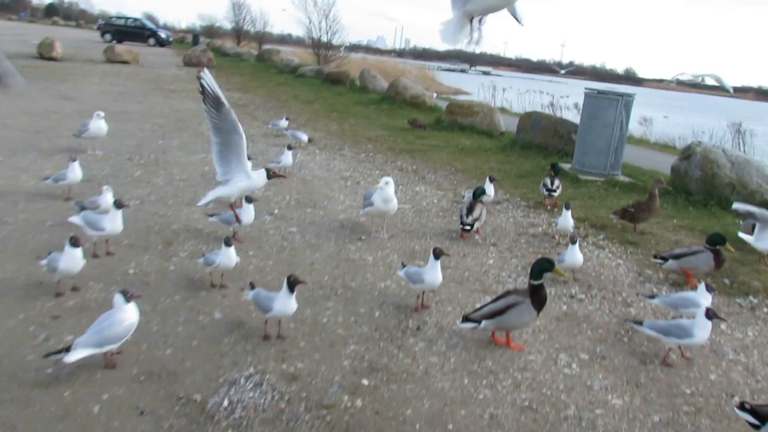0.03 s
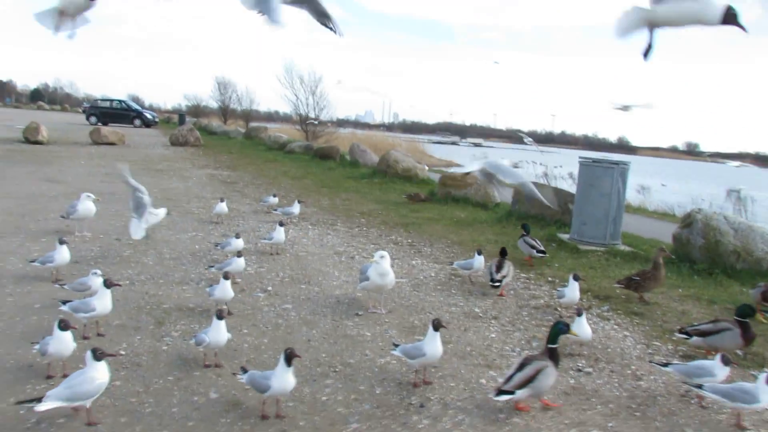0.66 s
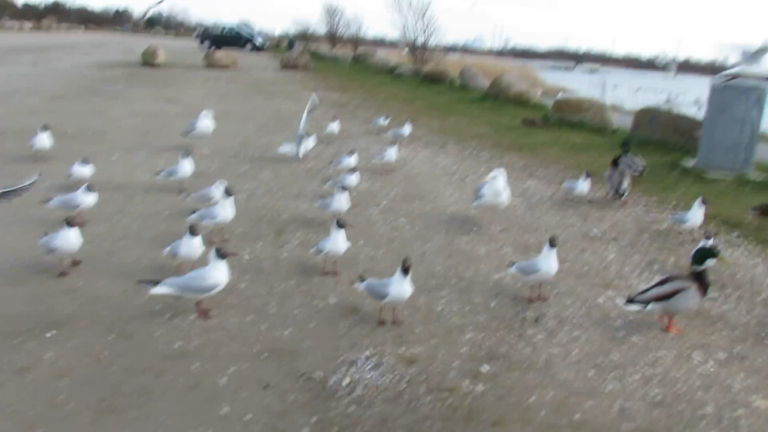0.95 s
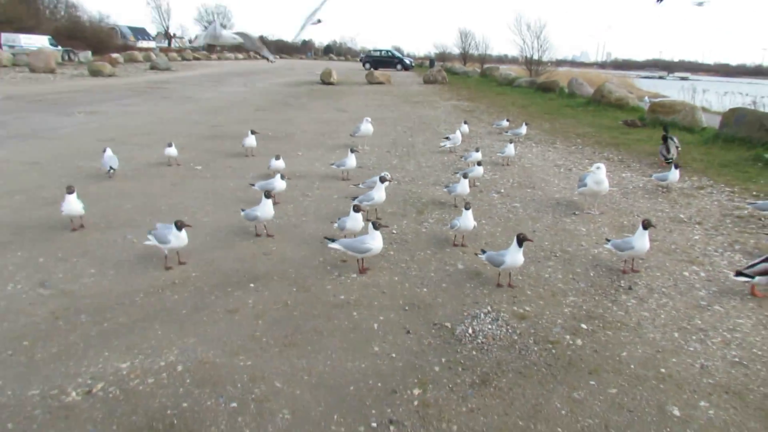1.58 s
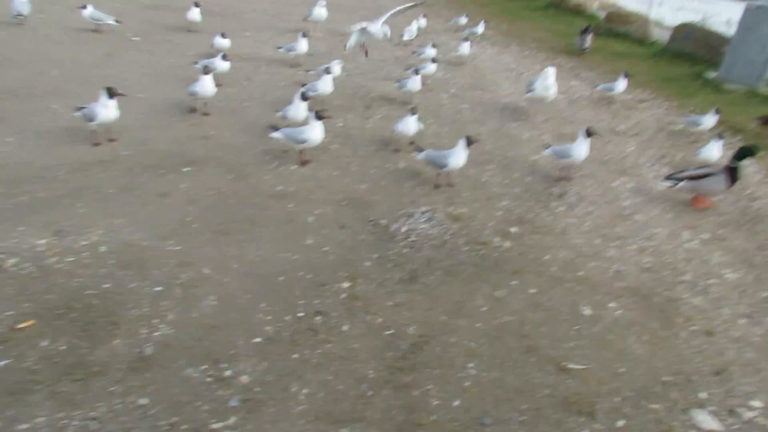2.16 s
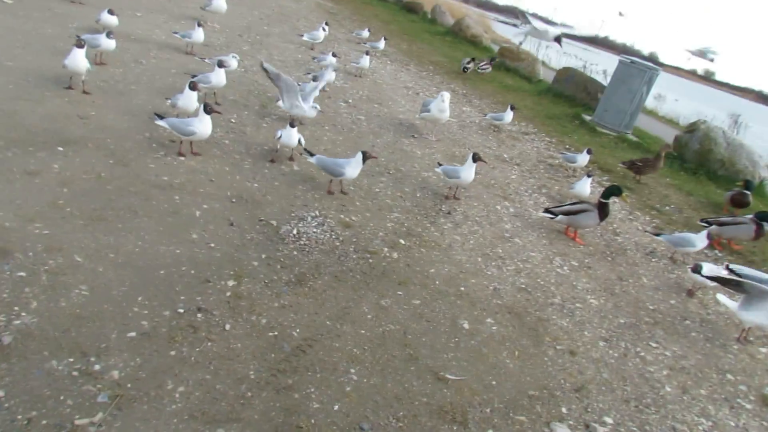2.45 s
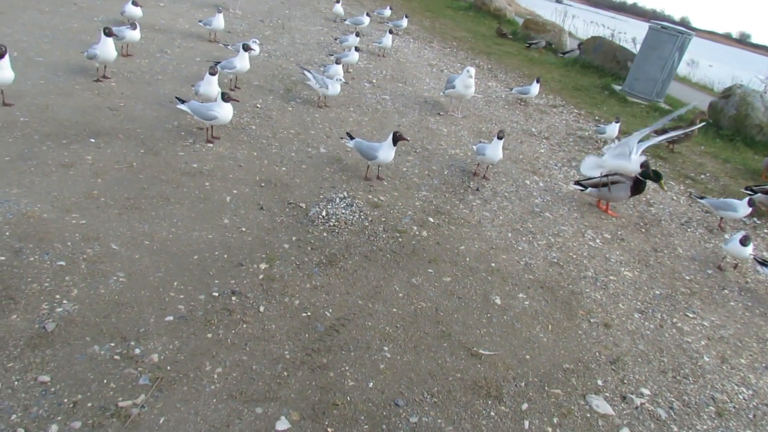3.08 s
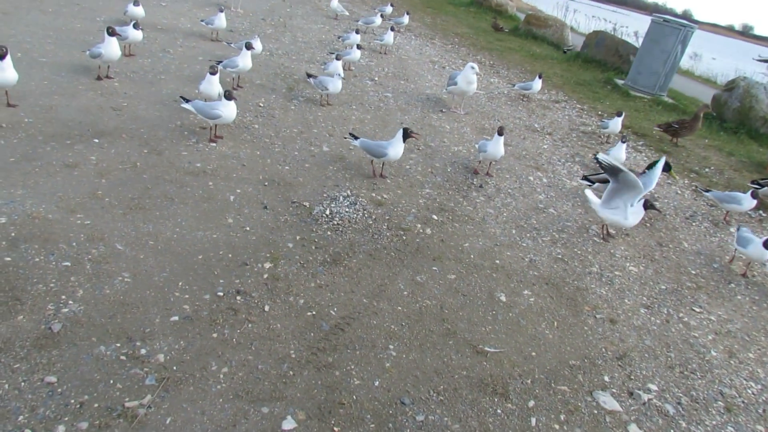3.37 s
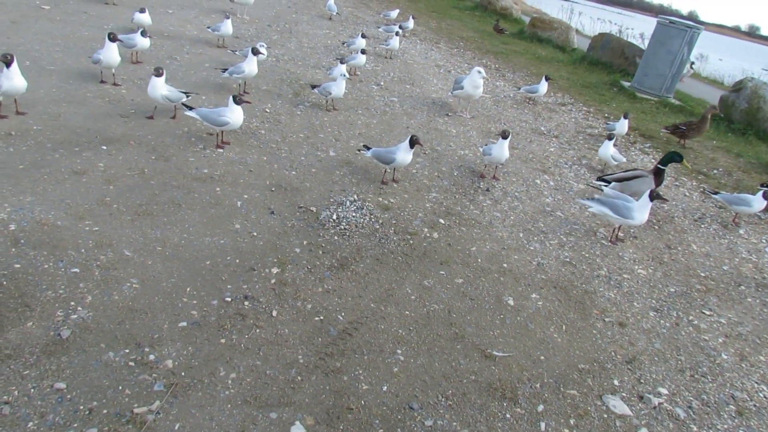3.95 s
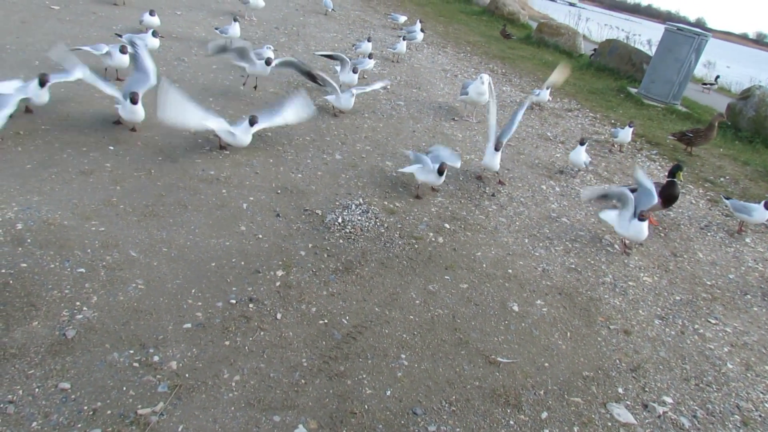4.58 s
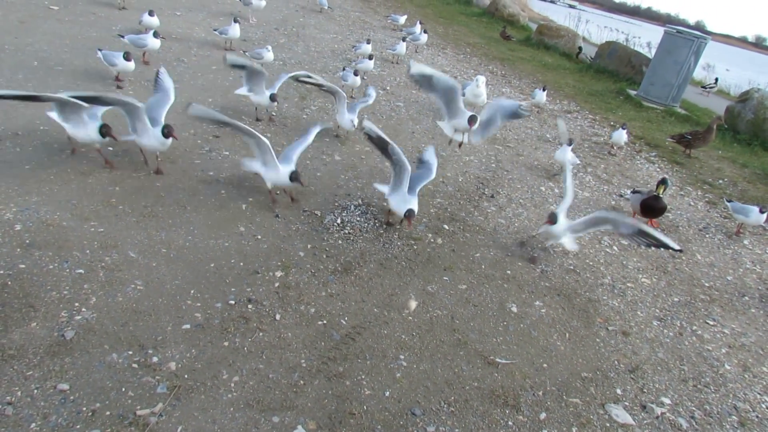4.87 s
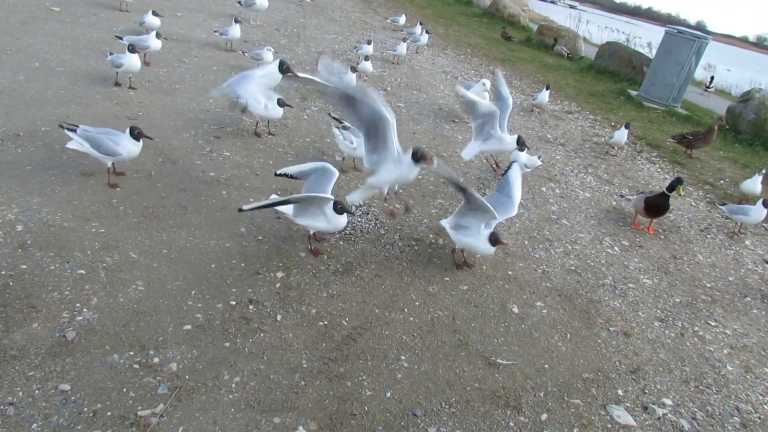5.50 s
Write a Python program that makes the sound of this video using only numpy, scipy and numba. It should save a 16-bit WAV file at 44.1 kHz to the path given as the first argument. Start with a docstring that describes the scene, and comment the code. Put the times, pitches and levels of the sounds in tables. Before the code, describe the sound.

Raspy gull calls rise and fall outdoors, growing denser as wings flutter and gravel clicks over a soft hush.

```python
"""First come sharp ticks of gravel and a wing flap, over a soft rustle, open air and a far flock.
Then black-headed gulls squabble over food a few metres away, on a gravel lot beside water.
Each cry is a stream of pulses from the syrinx (a bird's voice box), chopped by a fast trill and
shaped by the ringing throat. Calls rise and fall in pitch; short yelps only slide down.
The rocks and the bank echo the birds, and now and then wind puffs on the microphone."""
import sys
import numpy as np
from scipy import signal
from scipy.fft import rfft, irfft, next_fast_len
from scipy.io import wavfile
from scipy.ndimage import uniform_filter1d
from numba import njit

SR = 44100
rng = np.random.default_rng(int(sys.argv[2]) if len(sys.argv) > 2 else 0)


def bounce(signal):
    """Save signal as a 16-bit WAV file at the path given by the first command-line argument."""
    frames = np.transpose(np.atleast_2d(signal))
    limited = np.clip(frames, -1, 1)
    pcm = np.round(limited * 32767).astype(np.int16)
    wavfile.write(sys.argv[1], SR, pcm)


N = 252693
TIME = np.arange(N) / SR

# Tone of the open air: frequency_hz, level_db
AIR_SPECTRUM = [(15, -41), (25, -1.5), (69, 1), (215, -2.5), (552, -1.5), (871, -2.5), (1900, -1),
                (2700, -7), (3260, -18), (5730, -17), (6550, -16), (13900, -21), (15500, -35)]
# Loudness of the open air: time_s, level_db
AIR_LEVELS = [(0, -49.5), (1.4, -47), (2.6, -44.5), (5.73, -45.5)]
# Tone of the wind's rumble: frequency_hz, level_db
RUMBLE_SPECTRUM = [(20, -8), (70, 0), (130, -8), (300, -25), (1500, -70)]
# Loudness of the far flock: time_s, level_db
FLOCK_LEVELS = [(0, -33), (.14, -39.5), (.3, -53), (1.0, -43), (1.33, -76), (1.45, -36.5), (1.56, -51),
                (1.72, -59), (2.2, -49.5), (2.65, -58), (4.1, -35.5), (4.56, -47), (5.73, -51)]
# Loudness of the rustle: time_s, level_db
RUSTLE_LEVELS = [(0, -41.5), (.09, -41.5), (.25, -57), (2.71, -55.5), (2.73, -34.5), (3.04, -37),
                 (3.2, -31.5), (3.52, -48.5), (3.68, -44), (3.75, -38.5), (4.1, -43), (4.23, -51),
                 (4.56, -52), (4.7, -36.5), (5.0, -46), (5.2, -44), (5.6, -42.5), (5.73, -41)]
# Tone of the rustle: frequency_hz, level_db
RUSTLE_SPECTRUM = [(120, -10.5), (200, -9.5), (534, -11), (575, -11), (923, -8.5), (1280, -18), (1380, -6),
                   (1510, -7), (1650, -17.5), (3820, -10), (15500, -17.5)]
# Beaks and feet on gravel: start_s, peak_db, ring_hz, decay_s (time to fade by 60 dB)
GRAVEL_TICKS = [(0.013, -14.5, 1330, 0.044), (.037, -10, 1370, 0.054), (0.052, -11.5, 1330, 0.058),
                (0.205, -45, 2500, .015), (1.529, -21.5, 3410, 0.02), (1.689, -33, 2220, 0.022),
                (1.773, -19, 9000, .004), (2.725, -28.5, 4120, 0.012), (5.4, -20, 1850, .025),
                (5.681, -18.5, 5700, 0.0061)]
# Wing strokes: middle_s, level_db, length_s
WING_FLAPS = [(.05, -31, 0.019), (.075, -49, 0.011), (1.03, -39, 0.0052), (4.88, -35.5, 0.053),
              (5.09, -36, 0.02), (5.16, -29, 0.059), (5.32, -42.5, 0.03), (5.41, -41, 0.023),
              (5.48, -30.5, 0.055), (5.675, -34, 0.017)]
# Tone of a wing stroke: frequency_hz, level_db
FLAP_SPECTRUM = [(100, -28), (300, -8), (550, 0.5), (1400, -6), (2300, 0), (4000, -12), (8000, -20),
                 (15000, -22)]
# Calls that climb to a crest and sink: crest_s, rise_s, fall_s, crest_hz, level_db, bright_db,
# roughness (0-1), then the voice: trill_hz, trill_depth (0-1), low_hz, high_hz, width_hz, middle_db,
# top_db (these five set the throat's resonances), pan_db (left minus right)
ARCHED_CALLS = [ (.296, 0.05, 0.045, 504, -36.5, -2, 0.3, 55.7, 0.82, 1320, 3070, 447, -16.5, -23, 0),
                (0.468, 0.025, 0.056, 590, -31, -5.5, 0.65, 71, 0.79, 1740, 4070, 1110, -11, -1, 3),
                (.634, 0.15, 0.16, 1035, -23, 3, 0.3, 62.5, .55, 2190, 3360, 1520, -3, -6, 4.5),
                (.814, .17, .19, 1077, -40.5, 10.5, 0.24, 52.1, 0.75, 1590, 4150, 1250, -25, -1, 1),
                (.932, 0.037, 0.033, 701, -31.5, -13, 0.65, 51.5, 0.6, 1700, 4340, 846, -17, 12, 1),
                (1.002, 0.16, .14, 1017, -55.5, 10.5, 0.48, 61.3, 0.75, 2000, 5870, 504, -20, -6, 1),
                (1.09, 0.019, 0.05, 698, -31, -2.5, 0.42, 60, 0.45, 2020, 3320, 1317, 5, 9, 0),
                (1.17, 0.11, 0.14, 1021, -22.5, 1.5, 0.29, 59.7, 0.33, 2120, 3170, 1420, 3.5, -6, -1),
                (1.813, 0.053, 0.061, 708, -25, 7.5, 0.2, 79, 0.55, 1950, 3250, 805, -5, -11.5, -7.5),
                (1.878, 0.13, 0.16, 885.4, -24.5, 4.5, 0.5, 57, 0.47, 1890, 3070, 1083, -3.5, -9, -1.5),
                (2.013, 0.066, 0.055, 867, -26, 6.5, 0.6, 56.7, 0.82, 2280, 3540, 970, -13, -9.5, -7.5),
                (2.061, 0.035, 0.046, 826, -24, -3.5, 0.58, 72.4, 0.62, 2120, 3400, 1202, 7, 1, 0),
                (2.157, 0.064, 0.038, 584.4, -29, -0.5, 0.45, 65, 0.51, 1820, 3350, 1030, -36, -9.5, 1),
                (2.364, 0.13, 0.14, 1001, -22.5, -1.5, 0.2, 61.6, .8, 1790, 3750, 700, -40, -9, 0),
                (2.547, 0.052, 0.035, 808, -28, -6, 0.35, 60, 0.86, 1850, 3380, 940, -16, 1, -2),
                (2.797, 0.052, 0.048, 776, -25, -5.5, 0.38, 62, 0.59, 1700, 3260, 583, -18, -20, -5),
                (2.862, 0.064, 0.072, 560, -30.5, 6, 0.25, 58.2, 0.68, 1580, 3240, 500, -13, -18, 1),
                (2.946, 0.09, 0.1, 852, -20, -0.5, 0.33, 59.9, 0.71, 1590, 3290, 440, -20, -12, -1.5),
                (3.37, 0.17, 0.21, 980.6, -20.5, -5, 0.15, 65.1, 0.73, 1777, 3650, 460, -28, -9, -1),
                (3.58, 0.045, 0.033, 615, -31.5, -8.5, 0.13, 56.4, 0.47, 1960, 3880, 1090, -13, -16, -16),
                (3.67, 0.074, 0.16, 680, -47.5, 0, 0.04, 62.6, 0.44, 1880, 4030, 897, -22, -24, 2),
                (3.931, .27, 0.18, 1153, -29.5, 2, 0.68, 71.6, 0.32, 2080, 4300, 1250, -5, -23, -44),
                (4.384, .15, .175, 1047, -17, -4, 0.27, 65.5, .62, 1930, 3900, 506, -32, -5, 0),
                (4.656, 0.069, 0.064, 831, -22, 2.5, 0.26, 64, 0.76, 1900, 3280, 850, 3.5, -9.5, -4),
                (4.711, 0.053, 0.061, 840.5, -25.5, 8, 0.33, 71, 0.98, 1640, 3220, 720, -19, -9.5, -2),
                (4.798, .06, 0.09, 839, -23.5, 5, 0.42, 64.6, 0.75, 1730, 2920, 900, -19, -9.5, -4.5),
                (4.871, 0.041, 0.06, 850, -30.5, 13.5, 0.46, 71.8, 0.83, 1860, 3160, 920, -23, -2.5, -1),
                (4.92, 0.073, 0.065, 909.5, -23, 5, 0.42, 60.9, 0.49, 1890, 3320, 906, -13, -9, -2.5),
                (5.083, 0.079, 0.08, 844, -25, 5.5, 0.49, 63, 0.96, 1910, 3230, 860, -9, -7.5, -1),
                (5.161, 0.058, 0.057, 805, -21.5, 0, 0.51, 70.2, 0.43, 1990, 3150, 1420, -11, -1.5, -0.5),
                (5.229, 0.049, 0.051, 753, -23, -1.5, 0.6, 56, 0.23, 2380, 3870, 1740, -10, -2, -0.5),
                (5.334, 0.042, 0.038, 590.4, -26, 4, 0.2, 56.3, 0.71, 1800, 3010, 1040, -7, -6, 2),
                (5.406, .014, 0.057, 567, -29.5, 0, 0.38, 50.3, 0.74, 1680, 3100, 1280, -17, -6, 0),
                (5.471, 0.067, 0.057, 721, -20.5, -5, 0.6, 76.8, 0.48, 1760, 3130, 1294, -3, -2.5, -0.5),
                (5.547, 0.043, 0.023, 511, -29.5, -7, 0, 62.3, 0.99, 1700, 3230, 1280, -18, 4, 3),
                (5.664, .04, 0.044, 896, -41, -20, 0.83, 66.4, 0.35, 2019, 3250, 1494, -16, -11, -12),
                (5.73, 0.017, 0.028, 596, -28.5, -18, 0.5, 65, 0, 1920, 3180, 1480, -35, 3, -3), ]
# Short falling cries: start_s, length_s, first_hz, level_db, bright_db, roughness (0-1),
# then the same voice columns as the calls
SHORT_YELPS = [ (1.591, 0.069, 920, -21, 1.5, 0.23, 48, 0.78, 2030, 4000, 920, -7, -9, -12.5),
               (3.257, 0.076, 957, -18, 2, 0.48, 39, 0.6, 1840, 4400, 1250, -3, -29, -14),
               (3.503, 0.057, 1032, -15, -1, 0.48, 65.5, 0.9, 2100, 3930, 1080, -9, -13, -14),
               (4.139, .072, 807, -24, 10, .08, 48.9, .75, 2190, 3950, 704, -16, -22, -11.5), ]
# Wind hitting the microphone: middle_s, level_db, length_s
WIND_PUFFS = [(1.805, -22, 0.0062), (1.825, -35, 0.0089), (2.31, -50, 0.013), (2.77, -50.5, 0.033),
              (2.89, -44, 0.064), (3.02, -36.5, 0.039), (3.12, -42.5, 0.04), (3.25, -34, 0.015),
              (3.73, -38, 0.019), (5.62, -45, 0.052)]
# Tone of a puff: frequency_hz, level_db
PUFF_SPECTRUM = [(20, -10), (55, 14), (150, 3), (300, -6), (700, -9), (3000, -66)]

TOP_HZ = 15900  # upper limit of the sound
OPPOSITE = np.array([[1], [-1]])  # pushes left and right in opposite ways


def undb(db):
    """Turn decibels into a number to multiply by."""
    return 10 ** (np.asarray(db) / 20)


def curve(rows):
    """Join (time_s, value) points with straight lines."""
    return np.interp(TIME, *np.transpose(rows))


def unit(x):
    """Scale to an average strength (rms) of 1."""
    return x / np.sqrt(np.mean(x ** 2) + 1e-18)


def shape(x, response):
    """Filter x; response gives the gain at each frequency."""
    n = x.shape[-1]
    size = next_fast_len(n + 2048)
    hz = np.arange(size // 2 + 1) * SR / size + 1e-3
    return irfft(rfft(x, size) * response(hz), size)[..., :n]


def colour(x, spectrum):
    """Give x the tone of a spectrum table, at strength 1."""
    hz, db = np.transpose(spectrum)
    return unit(shape(x, lambda f: undb(np.interp(np.log(f), np.log(hz), db))))


def wander(n, rate_hz):
    """Random drift of strength 1, mostly slower than rate_hz."""
    return unit(shape(rng.standard_normal(n), lambda f: 1 / (1 + (f / rate_hz) ** 4)))


def place(x, pan_db):
    """Share a sound between left and right."""
    return x * unit(undb(OPPOSITE * pan_db / 2))


def stereo_noise(side):
    """Noise that is partly alike in both ears."""
    common, differing = rng.standard_normal((2, N))
    return common + side * differing * OPPOSITE


def swells(rows):
    """Add up smooth, bell-shaped rises in loudness."""
    return sum(undb(db) / (1 + ((TIME - middle_s) / length_s) ** 2 / 2) ** 2
               for middle_s, db, length_s in rows)


def open_air():
    """The soft, nearly steady hush of the outdoors."""
    hush = colour(stereo_noise(side=.66), AIR_SPECTRUM)
    return hush * undb(curve(AIR_LEVELS) + .5 * wander(N, 15))


def wind_rumble():
    """Wind rumbles faintly on the microphone, harder on the left."""
    rumble = colour(rng.standard_normal(N), RUMBLE_SPECTRUM) * undb(-60 + 2.5 * wander(N, 5))
    return place(rumble, pan_db=7) * OPPOSITE


def far_flock(count=26):
    """Far gulls: trilled arches of pitch, with little left but their second harmonic."""
    out = np.zeros((2, N))
    for k, (when, pitch, length, side) in enumerate(rng.random((count, 4))):
        crest_s = (k + when - .5) * TIME[-1] / (count - 1)
        along = (TIME - crest_s) / (.17 + .07 * length)
        on = np.abs(along) < 1
        drop = along[on] ** 2
        trill = np.cos(2 * np.pi * (56 + 10 * length) * TIME[on])
        hz = (930 + 150 * pitch) * (1 - .55 * drop + .032 * trill)
        phase = 2 * np.pi * np.cumsum(hz) / SR
        tone = np.sin(2 * phase) + undb(-11.5) * sum(np.sin(h * phase) for h in (1, 3, 4, 6))
        out[:, on] += place(tone * (1 - drop) * (1 + .14 * trill), pan_db=8 * (side - .5))
    return unit(out + 1.4 * echoes(out, decay_s=.38, dull_hz=5040)) * undb(curve(FLOCK_LEVELS))


def echoes(x, decay_s, dull_hz, length_s=.5, channels=2):
    """Many tiny reflections blur into a dull, fading tail, different in each channel."""
    t = TIME[:int(length_s * SR)]
    tail = rng.standard_normal((channels, len(t))) * undb(-60 * t / decay_s) * (t > .001)
    tail = shape(tail, lambda f: 1 / (1 + 1j * f / dull_hz))
    return signal.fftconvolve(x, unit(tail) / np.sqrt(len(t)), axes=1)[:, :x.shape[1]]


def rustle():
    """A hiss full of tiny crackles."""
    crackles = unit(stereo_noise(side=.6) * undb(2.7 * rng.exponential(size=N)))
    return colour(crackles, RUSTLE_SPECTRUM) * undb(curve(RUSTLE_LEVELS) + 3.08 * wander(N, 54))


def gravel():
    """Beaks and feet strike stones: each tick is a fast-dying burst with one broad resonance."""
    out = np.zeros((2, N))
    for start_s, peak_db, hz, decay_s in GRAVEL_TICKS:
        first = int(start_s * SR)
        t = TIME[:min(SR // 20, N - first)]
        noise = rng.standard_normal(len(t)) + 2.6 * rng.standard_normal((2, len(t)))
        burst = noise * undb(-60 * t / decay_s)
        width_hz = .25 * hz
        tick = shape(burst, lambda f: 1 / (1 + 1j * (f * f - hz * hz) / (f * width_hz)))
        out[:, first:first + len(t)] += undb(peak_db) * tick / np.abs(tick).max()
    return out


def wings():
    """Each wing stroke is a short whoosh, fluttered by the feathers."""
    whooshes = colour(stereo_noise(side=.4), FLAP_SPECTRUM) * swells(WING_FLAPS)
    return whooshes * undb(3.5 * wander(N, 160))


def call(crest_s, rise_s, fall_s, crest_hz, level_db, bright_db, roughness, *voice):
    """Pitch, loudness and brightness climb to a crest and sink, while the voice grows rougher."""
    t = span(crest_s - rise_s, crest_s + fall_s)
    rising = t < crest_s
    along = (t - crest_s) / np.where(rising, rise_s, fall_s)  # -1 at the start, 1 at the end
    away = np.abs(along)
    slack_hz = np.minimum(np.where(rising, 558.4, 443), .73 * crest_hz)  # the relaxed syrinx
    arch = np.exp(-(away / .72) ** 2.8)
    jump = 1 / (1 + (away / .45) ** 20)  # the voice flips into its high register
    hz = slack_hz + (crest_hz - slack_hz) * (.75 * arch + .25 * jump)
    fade_db = np.where(rising, 31.5, 28) * away ** 2.61
    dulling_db = 6 * away ** 2
    return gull(t, crest_s, hz, level_db - fade_db, bright_db - dulling_db, roughness + .15 * along, voice)


def span(start_s, end_s):
    """The sample times between two moments."""
    return TIME[max(int(start_s * SR), 0):int(end_s * SR)]


def gull(t, burst_s, hz, level_db, bright_db, roughness, voice):
    """One cry: the syrinx, trilling in step with a burst at burst_s, rings the throat and open beak."""
    trill_hz, trill_depth, low_hz, high_hz, width_hz, middle_db, top_db, pan_db = voice
    cycles = trill_hz * (t - burst_s) + .03 * wander(len(t), 25)
    pinch = np.abs(np.sin(np.pi * cycles))  # the airflow is pinched once a trill cycle
    gap = min(trill_depth, .97) * pinch ** (7.5 * (1.5 - trill_depth))  # deep gaps also last longer
    pitch_sag = 1 + .18 * (.15 - trill_depth * pinch ** 4)
    pulses = syrinx(t, hz * pitch_sag, np.clip(roughness, 0, 1), gap)
    opening = (hz / hz.max()) ** .24  # the beak is widest at the highest pitch
    low = throat(pulses, opening, [(low_hz, .97 * width_hz, 0), (1400, 330, -9), (530, 210, -5)])
    high = throat(pulses, opening, [
        (high_hz, 1.23 * width_hz, 0), (2650, 380, middle_db), (5200, 1100, top_db / 2 - 6),
        (8200, 1900, top_db - 8), (10900, 2800, top_db - 10.5), (14000, 2600, top_db - 17)])
    trill = unit(1 - gap) * undb(1.2 * wander(len(t), 35))  # bursts vary in strength
    soft_ends = np.clip(np.minimum(t - t[0], t[-1] - t) / .007, 0, 1)
    cry = place((low + undb(bright_db) * high) * undb(level_db) * trill * soft_ends, pan_db)
    first = np.searchsorted(TIME, t[0])
    return np.pad(cry + ground_bounce(cry), ((0, 0), (first, N - first - len(t))))


def syrinx(t, hz, roughness, gap):
    """The voice box makes sharp pulses; roughness adds shaky pitch, uneven strength and breath."""
    n = len(t)
    ragged = roughness * (1 + 1.23 * gap)  # roughest in the trill's gaps
    hz = hz * (1 + .01 * wander(n, 130) + .052 * ragged * wander(n, 400))
    phase = 2 * np.pi * np.cumsum(hz) / SR
    harmonics = np.arange(1, 33)[:, None]
    lowest_gain = undb(-3 * (hz / 1000) ** 2)  # the first harmonic weakens as the pitch climbs
    weights = (harmonics * hz < TOP_HZ) * np.where(harmonics == 1, lowest_gain, 1)
    lag_rad = .42 * harmonics ** 2  # smears each pulse into a tiny chirp
    pulses = unit(np.sum(np.cos(harmonics * phase - lag_rad) * weights, axis=0))
    uneven = .5 * np.cos(phase / 2) + .4 * np.cos(phase / 3) + .5 * wander(n, 450)
    breath = unit(rng.standard_normal(n) * (1 + np.cos(phase)))
    return pulses * (1 + ragged * uneven) + .55 * ragged * breath


def throat(x, opening, resonances):
    """Resonances (centre_hz, width_hz, level_db) rise as the beak opens; loudness is then evened out."""
    sound = 0
    for centre_hz, width_hz, level_db in resonances:
        hz, width_hz = centre_hz * opening, float(width_hz)
        sound += undb(level_db) * ring(ring(x, hz, width_hz), hz, width_hz)  # twice for steeper sides
    power = np.abs(uniform_filter1d(sound ** 2, size=900))
    return sound / np.sqrt(power + 1e-12)


@njit
def ring(x, hz, width_hz):
    """A filter that lets through a band around a moving centre frequency."""
    y, band, low = np.empty(len(x)), 0., 0.
    for i in range(len(x)):
        tuning, damping = np.tan(np.pi * hz[i] / SR), width_hz / hz[i]
        swing = (band + tuning * (x[i] - low)) / (1 + tuning * (tuning + damping))
        band, low = 2 * swing - band, low + 2 * tuning * swing
        y[i] = damping * swing
    return y


def ground_bounce(cry):
    """A cry scatters off the gravel and arrives from the sides, pushing left and right oppositely."""
    mono = cry.mean(axis=0, keepdims=True)
    return undb(-11) * echoes(mono, decay_s=.011, dull_hz=9000, length_s=.02, channels=1) * OPPOSITE


def yelp(start_s, length_s, first_hz, level_db, bright_db, roughness, *voice):
    """A yelp bursts out at full effort, then slides down almost an octave and dies."""
    t = span(start_s, start_s + length_s)
    age_s, attack_s = t - t[0], .0084
    fade_db = 21.5 * ((age_s / length_s) ** 1.46 + np.exp(-2 * age_s / attack_s))
    hz = first_hz / 2 ** (.92 * age_s / length_s)
    burst_s = start_s + .5 / voice[0]  # half a trill cycle in
    return gull(t, burst_s, hz, level_db - fade_db, bright_db, roughness, voice)


def wind_puffs():
    """Low puffs push the microphone's two sides in opposite ways, the left harder."""
    puffs = colour(rng.standard_normal(N), PUFF_SPECTRUM) * swells(WIND_PUFFS)
    return place(puffs, pan_db=7) * OPPOSITE


def scene():
    """Near gulls, echoed by the rocks and faintly by the far bank, among the small sounds of the lot."""
    calls = sum(call(*row) for row in ARCHED_CALLS)
    yelps = sum(yelp(*row) for row in SHORT_YELPS)
    near = calls + yelps + wings() + gravel()
    rocks = undb(-13) * echoes(near, decay_s=.053, dull_hz=9000)
    bank = undb(-31.5) * echoes(near, decay_s=.94, dull_hz=3000)
    return near + rocks + bank + far_flock() + rustle() + wind_puffs() + open_air() + wind_rumble()


def record(dry):
    """Sound reaches the microphone's left side a little later; the highest treble is cut."""
    lag_s = 1.9e-5
    left = shape(dry[0], lambda f: np.exp(-2j * np.pi * f * lag_s))
    treble_cut = signal.ellip(8, .1, 60, TOP_HZ, fs=SR, output="sos")
    return signal.sosfiltfilt(treble_cut, np.array([left, dry[1]]))


dry = scene()
out = record(dry)
bounce(out)
```